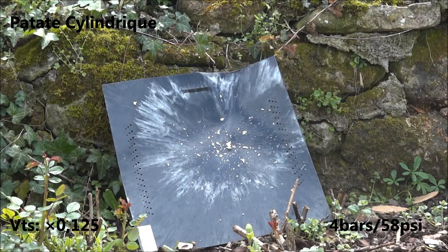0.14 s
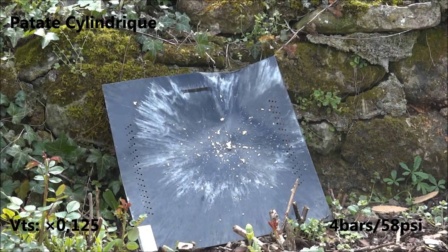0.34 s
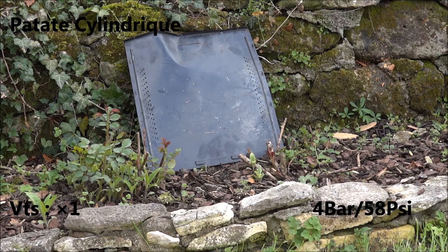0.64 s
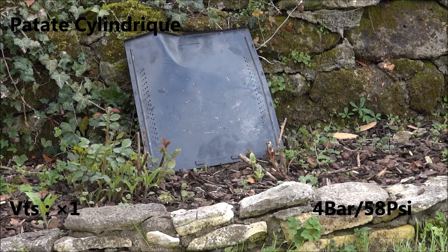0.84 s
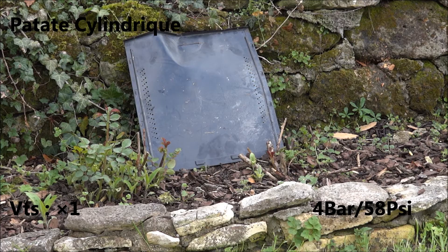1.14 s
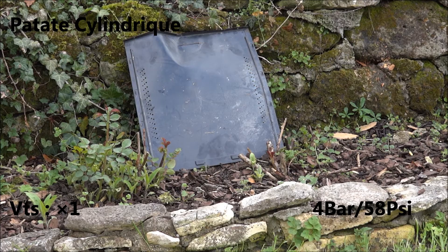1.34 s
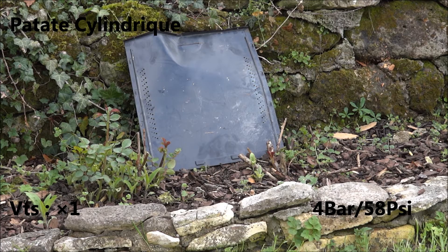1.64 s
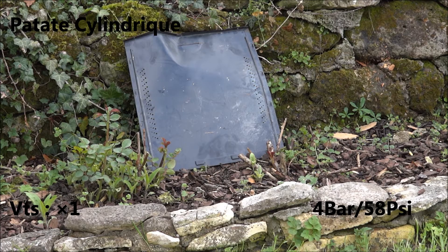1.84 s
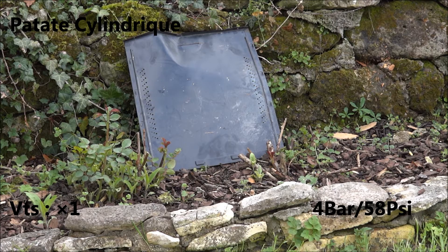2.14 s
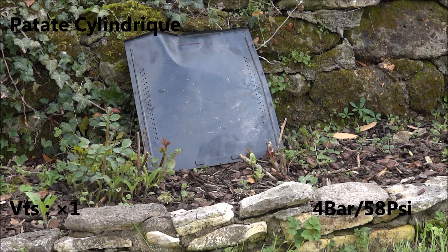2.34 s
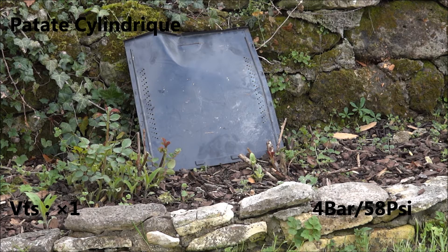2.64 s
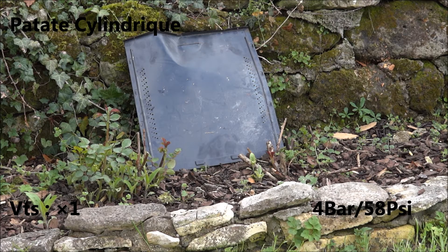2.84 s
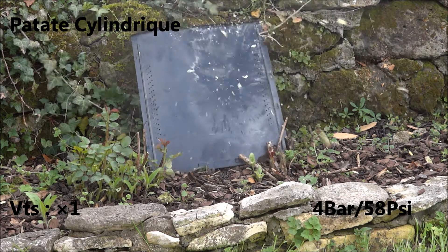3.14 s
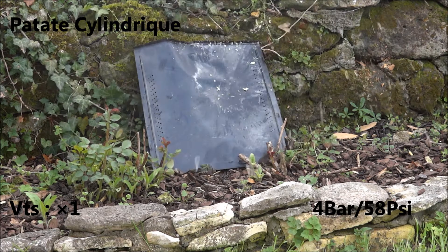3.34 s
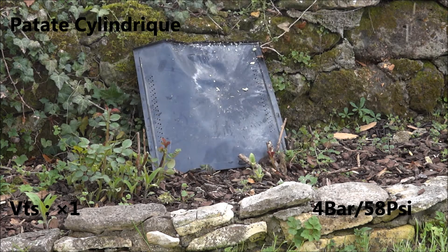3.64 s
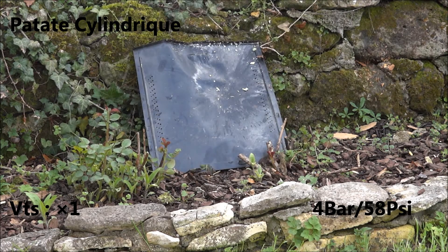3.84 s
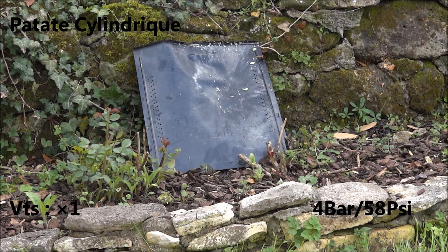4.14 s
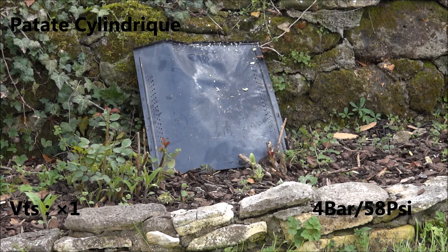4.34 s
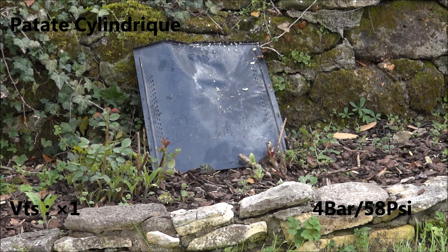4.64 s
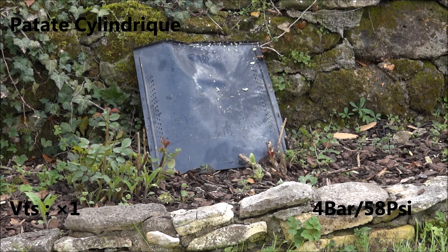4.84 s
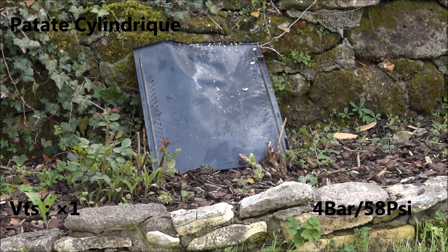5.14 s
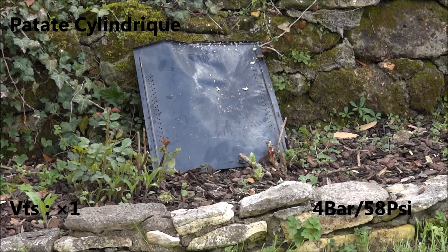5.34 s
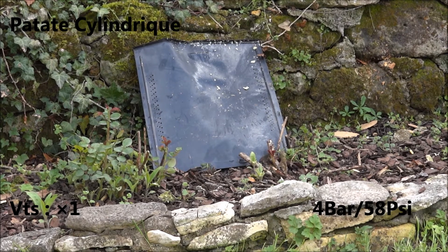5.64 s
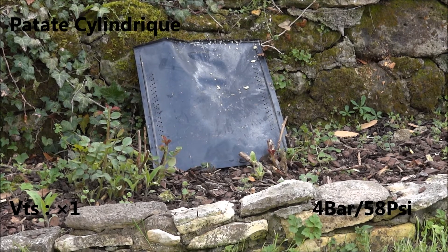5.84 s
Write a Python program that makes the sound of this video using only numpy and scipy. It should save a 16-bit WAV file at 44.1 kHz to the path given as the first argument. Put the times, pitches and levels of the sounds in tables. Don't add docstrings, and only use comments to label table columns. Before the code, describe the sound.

Starting from silence, a quiet garden opens with chattering and whistling small birds, a distant flock and faint traffic. Near three seconds a brief valve hiss and clack lead into a hard air blast, immediately followed by a potato bursting wetly on thin sheet steel. The sheet rattles, drops back and scrapes on stones. Afterwards the ambience is subdued, with crumbs ticking on dry leaves. Close stereo microphones outdoors.

```python
import sys
import numpy as np
from scipy import signal
from scipy.fft import rfft, irfft
from scipy.io import wavfile
from scipy.ndimage import uniform_filter1d

SR = 44100
rng = np.random.default_rng(int(sys.argv[2]) if len(sys.argv) > 2 else 0)


def master_out(mix):
    frames = np.transpose(np.atleast_2d(mix))
    ceiling = np.clip(frames, -1, 1)
    pcm = np.round(ceiling * 32767).astype(np.int16)
    wavfile.write(sys.argv[1], SR, pcm)


def gain_from_decibels(decibels):
    exponent = np.asarray(decibels, float) / 20
    return 10 ** exponent


N = 263975
t = np.arange(N) / SR
BIN_HZ = np.maximum(np.arange(N // 2 + 1) * SR / N, 1)

# [t/s, level/dB, rise/s, hold/s, fade t60/s]
VALVE_GUSTS = [
    (2.882, -20, .006, 0.0023, .03),
    (2.890, -17.5, .003, .015, .012),
    (2.909, -27.5, .001, 0.0038, .008),
]
# [f/Hz, density/dB per Hz]
VALVE_COLOUR = [(180, -66.5), (300, -32.5), (1300, -12.5), (2320, -10.5), (3190, -1.5), (6000, -17),
                (6740, -13.5), (9090, -14), (10700, -20.5), (14700, -21.5), (16000, -26.5)]
# [t/s, level/dB, rise/s, hold/s, fade t60/s]
MUZZLE_GUSTS = [
    (2.916, -15.5, 0.0008, .006, 0.03),
    (2.918, -14.5, 0.008, .046, .008),
]
# [f/Hz, density/dB per Hz]
MUZZLE_COLOUR = [(15, -55.5), (25, -31.5), (229, -3.5), (624, -2), (1130, -2.5), (1520, -5.5), (1650, -4),
                 (1790, -1.5), (2550, -3.5), (4370, -8), (8360, -7.5), (14400, -19.5), (16000, -40)]
# [t/s, peak/dB, f/Hz, t60/s]
BARREL_RINGS = [
    (2.8875, -3, 3320, .008),
    (2.887, -5, 4200, .012),
    (2.8885, -7, 3700, .015),
    (2.899, -11, 3200, .015),
    (2.893, -6.5, 3480, .008),
    (2.9165, -6.5, 2420, .02),
    (2.921, -7, 2550, .015),
    (2.9245, -4, 2340, .015),
    (2.932, -11, 2320, .015),
]

# [t/s, level/dB, rise/s, hold/s, fade t60/s]
SPLASH_GUSTS = [(2.9755, -9.5, 0.00056, 0.016, 0.085), (3.002, -12.5, .002, .005, .02),
                (3.013, -16, .003, 0.0072, 0.14), (3.027, -15, 0.0019, 0.013, 0.24),
                (3.068, -19, .002, .003, .05), (3.078, -18, 0.0023, 0.0045, 0.047),
                (3.092, -17, 0.0022, .007, 0.018), (3.126, -24, .001, .002, .02),
                (3.277, -37, 0.0016, .01, 0.093), (3.288, -27, 0.0032, 0.008, 0.08),
                (3.3, -38, .004, 0.012, 0.22)]
# [f/Hz, density/dB per Hz]
SPLASH_COLOUR = [(530, -31), (900, 0), (944, -5.5), (1050, -4), (2270, -6), (2470, -5.5), (3430, -7),
                 (8550, -8), (14500, -27), (16000, -36.5)]
# [t/s, level/dB, rise/s, hold/s, fade t60/s]
PULP_GUSTS = [
    (3.10, -27, 0.01, 0.022, 0.46),
]
# [f/Hz, density/dB per Hz]
PULP_COLOUR = [(710, -28), (1200, -2.5), (1380, 1), (8330, -6.5), (14100, -35), (15000, -41.5),
               (15500, -68)]

# [t/s, level/dB, fade t60/s]
SHEET_CONTACTS = [(2.975, -12.5, 0.2), (3.008, -13.5, 0.31), (3.06, -20, 0.17), (3.087, -16.5, 0.03),
                  (3.108, -25, 0.26), (3.278, -23, .03), (3.29, -28.5, 0.2), (3.31, -29.5, .12),
                  (3.326, -32, 0.15), (3.35, -36, .1), (3.381, -38, .1), (3.405, -46, .15),
                  (3.445, -54, .15)]
# [f/Hz, level/dB, t60/s]
SHEET_MODES = [(190, -9.5, 0.42), (250, -1.5, 0.19), (280, -2.5, .21), (327, 0.5, 0.11), (393, -2, .16),
               (448, 0.5, 0.21), (538, 1, 0.15), (590.5, -0.5, 0.22), (631, 2, 0.082), (769, 1.5, 0.14),
               (831, -1, .1), (871, -3, .12), (1030, -15.5, 0.063), (1059, -4.5, 0.17), (1185, -8, 0.053),
               (1318, -10.5, 0.26), (1476, -5, 0.11), (1650, -6.5, 0.036), (1646, -9, 0.24),
               (2170, -5.5, 0.043), (2090, -9, 0.2), (2383, -5.5, 0.097), (2550, -11, 0.037),
               (3000, -10, 0.055), (3500, -12.5, 0.075), (4100, -10.5, 0.043), (4680, -15.5, 0.026)]
# [t/s, peak/dB, f/Hz, t60/s]
SHEET_KNOCKS = [(3.058, -18, 200, 0.091), (2.9765, -6, 850, .04), (2.977, -8, 1250, .03),
                (2.9767, -6, 2700, .01), (2.9836, -6, 4680, .015), (3.008, -10, 350, 0.046),
                (3.021, -10, 800, 0.026), (3.092, -10, 800, 0.035), (3.083, -19, 1200, 0.059),
                (3.338, -28, 815, 0.089), (3.322, -25.5, 268, 0.1), (3.2945, -15.5, 820, 0.038),
                (3.2925, -12, 3500, 0.0061), (3.2945, -9.5, 2310, 0.0059), (3.296, -18.5, 1140, 0.033)]
# [t/s, level/dB, fade t60/s]
SCRAPE_CONTACTS = [
    (3.292, -25, 0.085),
    (3.308, -33, .06),
    (3.325, -38.5, 0.076),
    (3.38, -41.5, 0.068),
    (3.407, -52.5, 0.091),
    (3.458, -55, 0.063),
]
# [f/Hz, density/dB per Hz]
SCRAPE_COLOUR = [(290, -27), (500, -30), (825, 3.5), (935, -7), (1170, 4), (1400, -10), (1640, -0.5),
                 (3210, -17.5), (5000, -20), (6500, -44), (11000, -120)]
# [f/Hz, density/dB per Hz]
SOIL_COLOUR = [(60, -32), (110, -14), (170, -2), (220, 0), (330, -25)]

# [t/s, peak/dB, pan/dB]
CRUMB_HITS = [(.866, -37, 3), (3.5116, -42, 1), (3.7262, -28, 5), (3.942, -42, -5), (4.126, -54, 0),
              (4.154, -44, .5), (4.1764, -47, -1), (4.181, -51, 0), (4.2503, -51, 1), (4.2907, -48, -.5),
              (4.295, -51, 0), (4.314, -55, 0), (4.3475, -52, 0), (4.383, -53, 0), (4.59, -55, 0),
              (4.7247, -50, 0), (4.7416, -42, -3), (4.771, -42.5, -5), (4.886, -43, 3)]
# [t/s, peak/dB, pan/dB]
TWIG_SNAPS = [(.786, -46, 6), (1.012, -44, 0), (3.7270, -30, 1), (3.7605, -41.5, 1.5), (4.54, -50, 0),
              (4.921, -44, 1.5), (5.2755, -37.5, -10), (5.2825, -41, -10), (5.289, -42, -5),
              (5.328, -37.5, -11), (5.761, -40.5, -5)]
# [t/s, peak/dB, f/Hz, t60/s]
SMALL_TAPS = [
    (2.968, -27, 42, .08),
    (.785, -36.5, 1920, 0.0086),
    (.87, -43, 1920, 0.046),
    (4.845, -45.5, 1630, 0.022),
    (5.7835, -28.5, 1650, 0.0059),
    (5.948, -39, 171, 0.033),
]
# [t/s, level/dB, rise/s, hold/s, fade t60/s]
RUSTLE_GUSTS = [
    (.781, -52, .008, .035, .14),
    (.858, -55.5, .02, .14, .18),
    (4.452, -65, .04, .07, .11),
    (5.2715, -51, .003, .018, .09),
    (5.322, -57, .003, .01, .12),
    (5.572, -61, .02, .035, .11),
]
# [f/Hz, density/dB per Hz]
RUSTLE_COLOUR = [(500, -18), (1300, 3), (3000, 4.5), (6000, 0.5), (10000, 3), (13000, -11), (15500, -7)]

# [t/s, length/s, from f/Hz, held f/Hz, peak/dB]
BIRD_WHISTLES = [
    (1.09, 0.21, 7290, 5630, -46),
    (1.245, .17, 5700, 5260, -53),
    (1.107, 0.27, 5130, 4410, -53.5),
    (1.765, 0.21, 6190, 4110, -38),
    (1.976, .13, 4200, 3370, -49),
    (2.1, .075, 3400, 3080, -51),
    (5.642, 0.048, 4700, 4520, -45),
    (5.758, 0.045, 3657, 3580, -53),
    (5.511, .035, 4750, 3800, -52),
]
# [t/s, level/dB]
BIRD_TICKS = [
    (2.352, -54.5),
    (2.458, -57),
    (2.572, -56),
    (2.684, -58),
    (2.803, -58),
]
# [t/s, length/s, from f/Hz, level/dB]
BIRD_CHIPS = [
    (0.707, .016, 4930, -51.5),
    (1.419, 0.048, 4730, -49),
    (2.377, .024, 5300, -57),
    (4.097, 0.018, 5100, -57),
    (4.677, .027, 5500, -57),
    (4.786, 0.021, 6030, -57.5),
    (4.998, 0.03, 5300, -54.5),
]
# [t/s, length/s, from f/Hz, level/dB]
BIRD_SLURS = [
    (1.463, .075, 5500, -57),
    (1.53, .025, 4200, -58),
    (1.555, 0.038, 4200, -49),
    (1.653, 0.035, 4250, -47),
    (2.33, .03, 5000, -54),
    (2.5, 0.049, 4200, -58),
    (2.544, 0.046, 3750, -49),
    (2.845, 0.018, 3300, -48),
    (4.188, 0.02, 5150, -60),
]
# [t/s,
# length/s, from f/Hz, to f/Hz, level/dB]
BIRD_CHATTER = [(0.699, .0073, 3280, 5050, -50), (0.792, 0.028, 2510, 2860, -50),
                (0.807, 0.058, 3350, 3700, -47), (.865, 0.041, 3700, 3450, -45),
                (0.86, 0.02, 3340, 2660, -41), (0.877, 0.044, 2850, 2705, -38.5),
                (0.929, 0.026, 3410, 3675, -33), (.945, 0.014, 3500, 2650, -46),
                (0.947, 0.05, 3600, 3500, -39.5), (.99, .075, 3610, 3750, -42), (.9, .035, 3500, 3450, -47),
                (1.715, .015, 2950, 2690, -51), (1.726, 0.014, 2700, 3200, -48),
                (2.24, 0.024, 4000, 6600, -56)]
# [t/s, length/s, f/Hz, level/dB]
BIRD_WARBLES = [(.827, 0.058, 4250, -52), (.929, .045, 2750, -62), (.93, 0.063, 7130, -52),
                (.99, 0.037, 4220, -54), (1.659, 0.064, 4470, -50), (1.755, 0.036, 3550, -55),
                (1.84, 0.029, 3080, -56), (1.674, 0.038, 3700, -50), (1.85, 0.092, 3100, -58),
                (5.318, 0.1, 4450, -63), (5.713, .025, 4560, -60), (5.843, .022, 3570, -61)]
# [t/s, level/dB, left minus right/dB]
FLOCK_LEVEL = [(.55, -56, 2), (.75, -61, 1), (.95, -50.5, 5.5), (1.15, -62.5, 2), (1.5, -65, 3.5),
               (2.0, -51.5, 1.5), (2.3, -57.5, -1.5), (2.549, -59.5, 4), (2.87, -57.5, .5),
               (3.6, -64.5, -0.5), (4.3, -64.5, 0), (4.7, -58, -0.5), (5.1, -71.5, -2), (5.5, -57.5, 1),
               (5.95, -65.5, -1)]

# [f/Hz, density/dB per Hz]
TRAFFIC_COLOUR = [(13, -43.5), (22, -12), (64, -4), (169, -2.5), (256, -1), (444, 0), (910, 2.5),
                  (1020, -0.5), (1710, -4.5), (3230, -12.5), (5310, -16.5), (9220, -22.5), (16000, -28)]
# [f/Hz, density/dB per Hz]
HISS_COLOUR = [(2500, -28), (5000, -1.5), (9000, -3.5), (12000, -6), (15500, -8.5)]
# [t/s, level/dB]
BREEZE_LEVEL = [
    (.55, -67.5),
    (1.0, -65),
    (1.6, -67.5),
    (2.9, -67.5),
    (5.95, -70.5),
]
# [f/Hz, level/dB]
NEAR_WIDTH = [(60, -22.5), (110, -22.5), (200, -21.5), (380, -18), (700, -14.5), (1290, -13.5), (2380, -11),
              (4400, -11.5), (8120, -9.5), (15000, -18)]
# [f/Hz, level/dB]
DIFFUSE_WIDTH = [(60, -13), (110, -14), (200, -8), (380, -2), (700, -3), (1290, -2), (2380, -2.5),
                 (4400, -7.5), (8120, -11), (15000, -26)]

START_S, STOP_S, TOP_HZ = .5527, 5.957, 15600
CONTACT_RISE_S, CONTACT_HOLD_S = 0.0041, .012
LOOSE_T60_S = .14
THUD_DB, THUD_SLOWER = -21.5, 1.5
CRUMB_HZ, CRUMB_OCTAVES = 8600, .8
CRUMB_OCTAVES_PER_DB, FAINTEST_DB = 0.11, -50
TWIG_HZ, TWIG_OCTAVES = 4000, 3.4
TICK_T60_S, TICK_TAIL_DB, TICK_TAIL_S = .0025, -18, .025
GLIDE_S_KHZ, GLIDE_BEND = .1, 1.4
SETTLE_S, SETTLE_SHARE = .085, .27
GLIDE_DB_PER_KHZ, FADE_SHARE, FADE_DB = -13, 0.28, -9
TICK_S, TICK_HZ, TICK_RISE, TICK_ROUGH = 0.028, 5500, 1.14, .45
CHIP_FALL, CHIP_ROUGH = .61, .12
SLUR_FALL, SLUR_ROUGH = .82, 0.45
CHATTER_ROUGH, WARBLE_ROUGH = 0.72, 0.51
TOWN_DB = -55
DUCK_S, DUCK_DB, DUCK_HOLD_S, RECOVER_DB_PER_S = 2.9, -7.5, 0.89, 4
HISS_DUCK_SHARE = 0.52


def cannon():
    valve = gust(VALVE_GUSTS, VALVE_COLOUR, 3) + gust(MUZZLE_GUSTS[:1], VALVE_COLOUR, 3)
    blast = gust(MUZZLE_GUSTS[1:], MUZZLE_COLOUR, 2.6)
    return valve + blast + pings(BARREL_RINGS)


def sheet():
    force = rng.standard_normal((2, N)) * flicker(700, 6.5) * puffs(contacts(SHEET_CONTACTS))
    u = np.arange(SR // 3) / SR
    jitter = rng.uniform(-1.08, 1, (len(SHEET_MODES), 4, 2))
    ring = np.zeros(len(u))
    for k, ((hz, db, t60), dents) in enumerate(zip(SHEET_MODES, jitter)):
        t60 = min(t60, LOOSE_T60_S)
        sign = (-1) ** k
        dent_hz = hz * (1 + .01 * dents.mean())
        ring += sign * gain_from_decibels(db - 60 * u / t60) * np.sin(2 * np.pi * hz * u)
        ring += sign * gain_from_decibels(db + 3.0 - 60 * u / (0.18 * t60)) * np.sin(2 * np.pi * dent_hz * u)
    ring /= np.sqrt(np.sum(ring ** 2))
    mid, side = (signal.fftconvolve(f, ring)[:N] for f in force)
    both = pair(mid * gain_from_decibels(-1.5) + pings(SHEET_KNOCKS), side * gain_from_decibels(-0.5))
    thin = signal.butter(4, 165, "high", fs=SR, output="sos")
    return signal.sosfilt(thin, both)


def splash():
    return gust(SPLASH_GUSTS, SPLASH_COLOUR, 2.6) + gust(PULP_GUSTS, PULP_COLOUR, 0.86)


def scrape():
    return gust(contacts(SCRAPE_CONTACTS), SCRAPE_COLOUR, 3.0)


def soil_thud():
    rows = contacts(np.array(SHEET_CONTACTS) * [1, 1, THUD_SLOWER])
    return gain_from_decibels(THUD_DB) * gust(rows, SOIL_COLOUR, 2)


def contacts(rows):
    return [(s, db, CONTACT_RISE_S, CONTACT_HOLD_S, t60) for s, db, t60 in rows]


def dry_ticks(rows, hz, octaves, octaves_per_db):
    out = np.zeros((2, N))
    grains = rng.standard_normal((len(rows), 900))
    u = np.arange(900) / SR
    env = gain_from_decibels(-60 * u / TICK_T60_S) + gain_from_decibels(TICK_TAIL_DB - 60 * u / TICK_TAIL_S)
    for (s, db, pan_db), grain in zip(rows, grains):
        spread = max(octaves + octaves_per_db * (db - FAINTEST_DB), .2)
        edges = np.minimum(hz * 2 ** (np.array([-.5, .5]) * spread), TOP_HZ)
        band = signal.butter(3, edges, "band", fs=SR, output="sos")
        tick = signal.sosfilt(band, grain * env)
        i = int(s * SR)
        out[:, i:i + 900] += tick / np.abs(tick).max() * gain_from_decibels(db + np.array([[pan_db], [-pan_db]]) / 2)
    return out


def small_sounds():
    crumbs = dry_ticks(CRUMB_HITS, CRUMB_HZ, CRUMB_OCTAVES, CRUMB_OCTAVES_PER_DB)
    twigs = dry_ticks(TWIG_SNAPS, TWIG_HZ, TWIG_OCTAVES, 0)
    return crumbs + twigs + pings(SMALL_TAPS) + gust(RUSTLE_GUSTS, RUSTLE_COLOUR, 2.6)


def birds():
    waver, throb = np.log(flicker(300, 1)), flicker(170, 9)
    song = whistles(waver, throb) + short_notes(waver, throb)
    s, _, pan_db = np.transpose(FLOCK_LEVEL)
    pan = gain_from_decibels(np.interp(t, s, pan_db) * np.array([[.5], [-.5]]))
    return pan * (echoes(song, .5, -5.5) + flock())


def whistles(waver, throb):
    song = np.zeros(N)
    for s, length, from_hz, held_hz, db in BIRD_WHISTLES:
        i = slice(int(s * SR), int((s + length) * SR))
        u = np.abs(t[i] - s) / length
        settle = min(GLIDE_S_KHZ * 1000 / max(from_hz - held_hz, 1), SETTLE_S, SETTLE_SHARE * length)
        glide = np.exp(-(u * length / settle) ** GLIDE_BEND)
        pitch = (held_hz + (from_hz - held_hz) * glide) * (1 + 0.063 * waver[i])
        edge = np.clip(np.minimum(u, 1 - u) * length / 0.0069, 0, 1)
        glide_db = GLIDE_DB_PER_KHZ * np.abs(pitch - held_hz) / 1000
        fade_db = FADE_DB * np.clip(1 - (1 - u) / FADE_SHARE, 0, 1)
        env = edge * gain_from_decibels(db + glide_db + fade_db) * throb[i] ** 0.15
        song[i] += np.sqrt(2) * env * np.sin(2 * np.pi * np.cumsum(pitch) / SR)
    return song


def short_notes(waver, throb):
    song = np.zeros(N)
    for s, length, from_hz, to_hz, db, rough in notes():
        i = slice(int(s * SR), int((s + length) * SR))
        u = np.abs(t[i] - s) / length
        pitch = (from_hz + (to_hz - from_hz) * u ** .8) * (1 + .3 * rough * waver[i])
        env = np.abs(np.sin(np.pi * u)) ** .6 * throb[i] ** rough
        song[i] += np.sqrt(2) * gain_from_decibels(db) * env * np.sin(2 * np.pi * np.cumsum(pitch) / SR)
    return song


def notes():
    return ([(s, TICK_S, TICK_HZ, TICK_HZ * TICK_RISE, db, TICK_ROUGH) for s, db in BIRD_TICKS]
            + [(s, length, hz, hz * CHIP_FALL, db, CHIP_ROUGH) for s, length, hz, db in BIRD_CHIPS]
            + [(s, length, hz, hz * SLUR_FALL, db, SLUR_ROUGH) for s, length, hz, db in BIRD_SLURS]
            + [(*row, CHATTER_ROUGH) for row in BIRD_CHATTER]
            + [(s, length, hz, hz, db, WARBLE_ROUGH) for s, length, hz, db in BIRD_WARBLES])


def flock():
    s, db, _ = np.transpose(FLOCK_LEVEL)
    slurs = np.zeros(N)
    for start, length, hz, glide in rng.uniform([.5, .03, 2900, -.25], [5.9, .15, 4600, .05], (130, 4)):
        i = slice(int(start * SR), min(int((start + length) * SR), N))
        u = np.abs(t[i] - start) / length
        slurs[i] += np.sin(np.pi * u) * np.sin(2 * np.pi * np.cumsum(hz * (1 + glide * u)) / SR)
    haze = [(1800, -26.5), (2900, -4.5), (3700, 2.5), (4500, -2), (6000, -23.0)]  # f/Hz, density/dB per Hz
    far = pair(*(shape(rng.standard_normal(N), haze) for _ in range(2)), DIFFUSE_WIDTH)
    return gain_from_decibels(np.interp(t, s, db) + duck_db()) * (gain_from_decibels(-2) * far + gain_from_decibels(-12) * echoes(slurs, .7, 6))


def background():
    s, hiss_db = np.transpose(BREEZE_LEVEL)
    duck = duck_db()
    hiss_gain = gain_from_decibels(np.interp(t, s, hiss_db) + 4 + HISS_DUCK_SHARE * duck)
    octave = np.log2(BIN_HZ)
    both = []
    for _ in range(2):
        noise = rfft(shape(rng.standard_normal(N), TRAFFIC_COLOUR))
        bands = (irfft(noise * np.clip(1 - np.abs(octave - k), 0, 1), N) for k in range(3, 15))
        town = sum(band * flicker(5, 1.2) for band in bands)
        hiss = shape(rng.standard_normal(N), HISS_COLOUR)
        both.append(town * gain_from_decibels(TOWN_DB + duck) + hiss * hiss_gain)
    return pair(*both, DIFFUSE_WIDTH)


def duck_db():
    back = DUCK_DB + RECOVER_DB_PER_S * np.maximum(t - DUCK_S - DUCK_HOLD_S, 0)
    return np.minimum(back, 0) * np.clip((t - DUCK_S) / .05, 0, 1)


def echoes(x, t60, wet_db):
    u = np.arange(int(SR * .6)) / SR
    env = gain_from_decibels(-60 * u / t60) * flicker(35, 3.6)[:len(u)] * np.clip(u / 0.0078, 0, 1)
    tails = rng.standard_normal((2, len(u))) * env
    tails *= gain_from_decibels(wet_db) / np.sqrt(np.sum(tails[0] ** 2))
    mid, side = (signal.fftconvolve(x, tail)[:N] for tail in tails)
    return pair(x + mid, side * gain_from_decibels(4.0))


def pair(x, other, width=NEAR_WIDTH):
    hz, db = np.transpose(width)
    side = irfft(rfft(other) * gain_from_decibels(np.interp(np.log(BIN_HZ), np.log(hz), db)), N)
    return np.array([x + side, x - side])


def gust(rows, spectrum, grain_db):
    env = puffs(rows) * flicker(500, grain_db)
    return pair(*(env * shape(rng.standard_normal(N), spectrum) for _ in range(2)))


def puffs(rows):
    power = np.zeros(N)
    for s, db, rise, hold, t60 in rows:
        i = slice(int(s * SR), int((s + 1) * SR))
        fade = -60 * np.clip(t[i] - s - rise - hold, 0, 1) / t60
        power[i] += (np.clip((t[i] - s) / rise, 0, 1) * gain_from_decibels(db + fade)) ** 2
    return np.sqrt(power)


def pings(rows):
    out = np.zeros(N)
    for s, db, hz, t60 in rows:
        i = slice(int(s * SR), int((s + .2) * SR))
        u = np.abs(t[i] - s)
        onset = np.minimum(u * hz, 1)
        out[i] += gain_from_decibels(db - 60 * u / t60) * np.sin(2 * np.pi * hz * u) * onset
    return out


def shape(x, spectrum):
    hz, db = np.transpose(spectrum)
    colour_db = np.interp(np.log(BIN_HZ), np.log(hz), db, left=-70, right=-70)
    y = irfft(rfft(x) * gain_from_decibels(colour_db), N)
    return y / np.sqrt(np.mean(y ** 2))


def flicker(rate, depth_db):
    k = max(int(SR / rate), 1)
    steps = np.repeat(rng.standard_normal(N // k + 1), k)[:N]
    gain = gain_from_decibels(depth_db * uniform_filter1d(steps, k))
    return gain / np.sqrt(np.mean(gain ** 2))


def scene():
    bang = cannon() + sheet() + splash() + scrape() + soil_thud()
    middle = bang.mean(axis=0)
    returns = echoes(middle, 0.2, -23.5) - middle
    return bang + returns + small_sounds() + birds() + background()


def roll_off(x):
    return signal.sosfilt(signal.butter(12, 16440, fs=SR, output="sos"), x)


def record(dry):
    fade_in = np.clip((t - START_S) / 0.00084, 0, 1)
    fade_out = np.clip((STOP_S - t) / 0.0028, .02, 1)
    top = signal.ellip(7, .5, 45, TOP_HZ, fs=SR, output="sos")
    rounded = np.tanh(0.97 * dry) / 0.85
    return roll_off(signal.sosfilt(top, rounded) * (fade_in * fade_out))


dry = scene()
out = record(dry)
master_out(out)
```